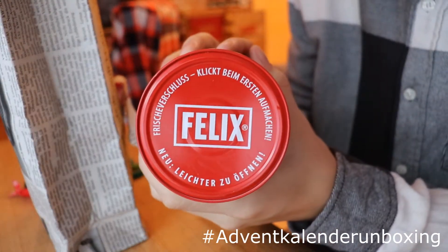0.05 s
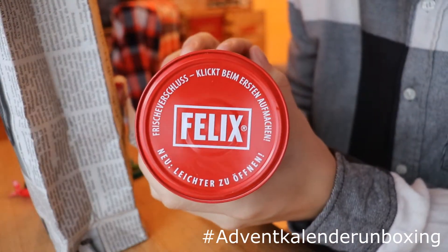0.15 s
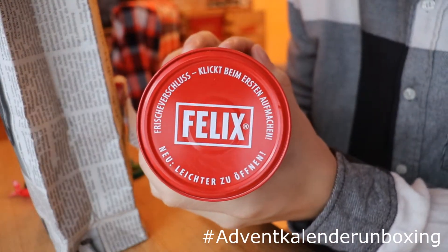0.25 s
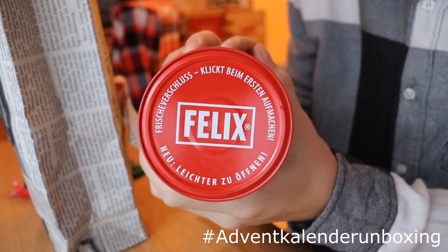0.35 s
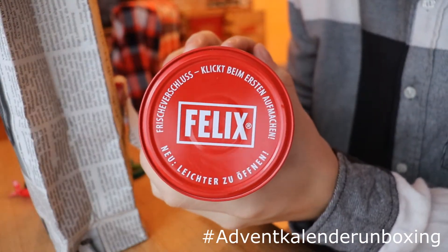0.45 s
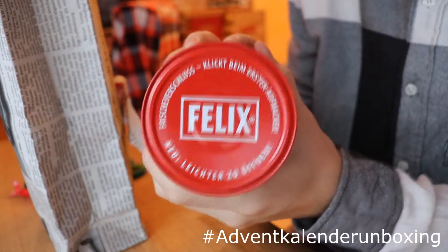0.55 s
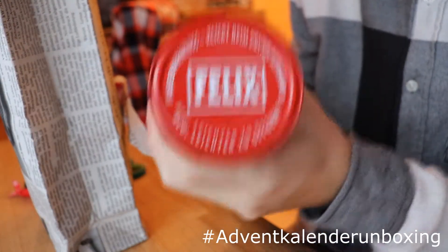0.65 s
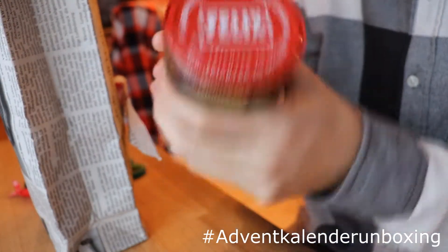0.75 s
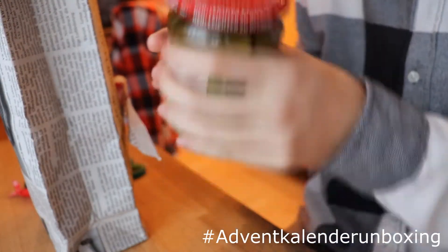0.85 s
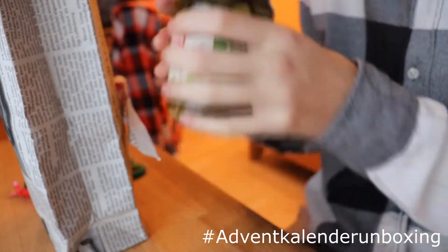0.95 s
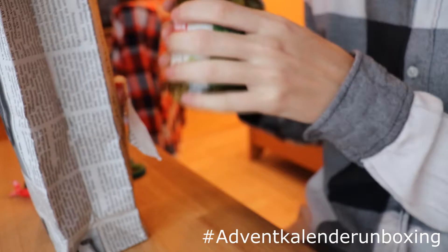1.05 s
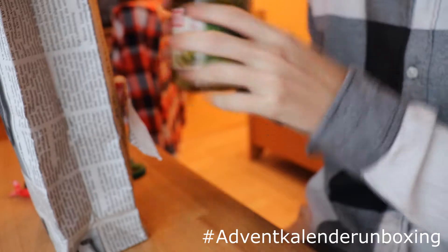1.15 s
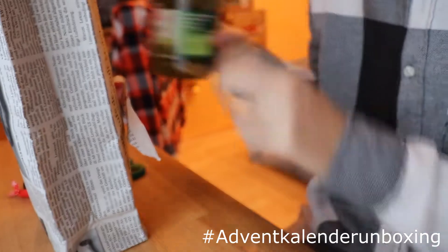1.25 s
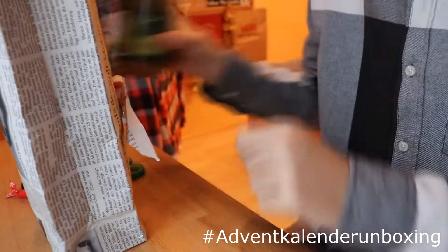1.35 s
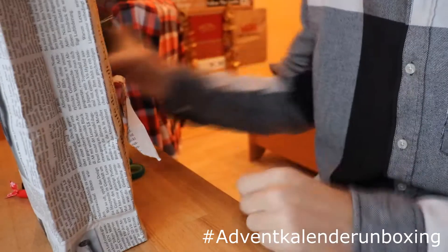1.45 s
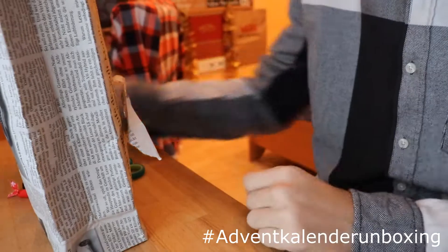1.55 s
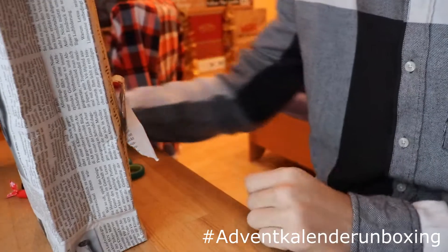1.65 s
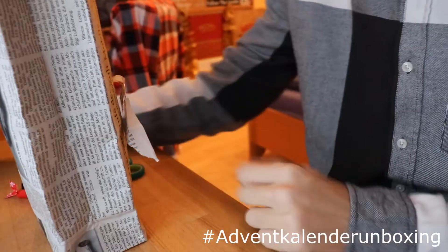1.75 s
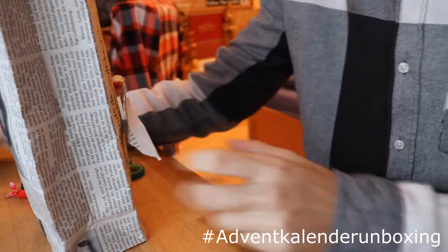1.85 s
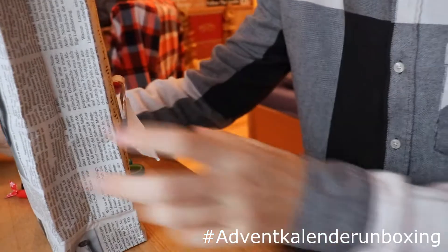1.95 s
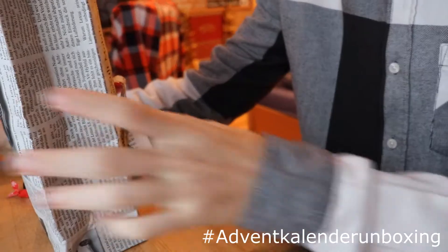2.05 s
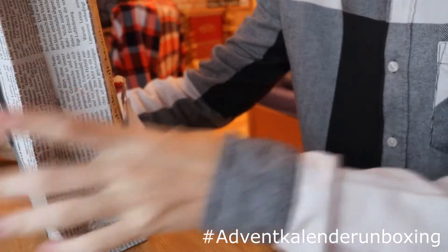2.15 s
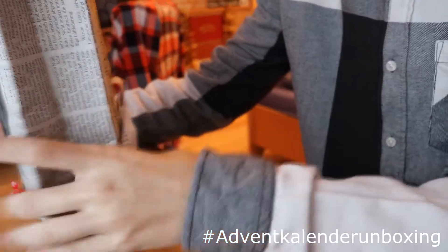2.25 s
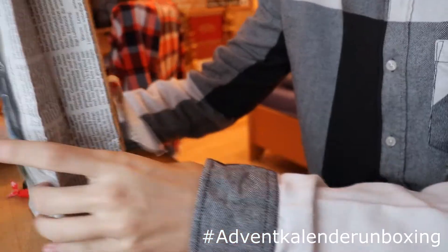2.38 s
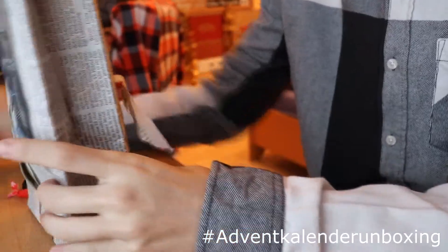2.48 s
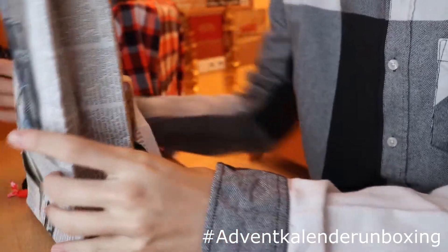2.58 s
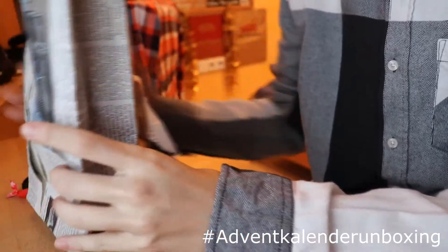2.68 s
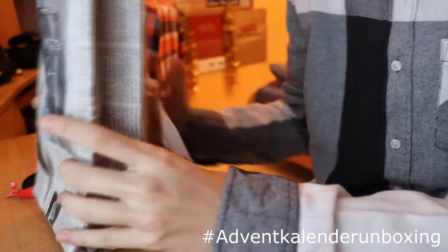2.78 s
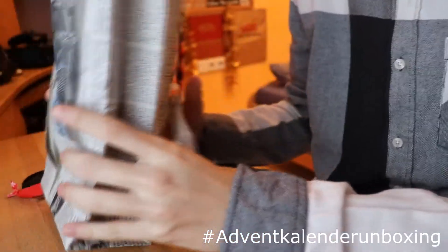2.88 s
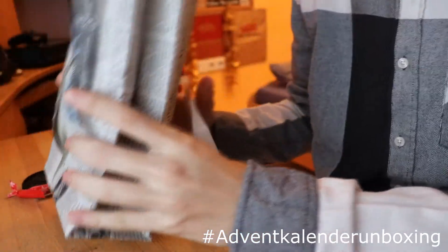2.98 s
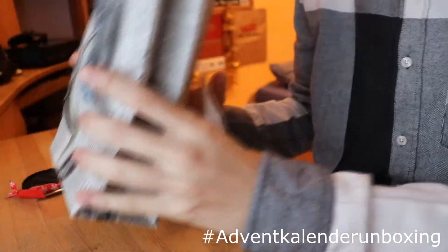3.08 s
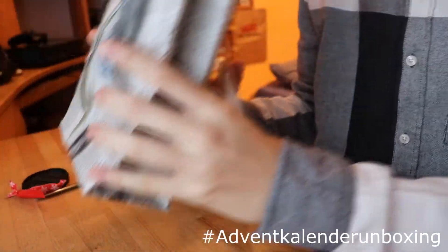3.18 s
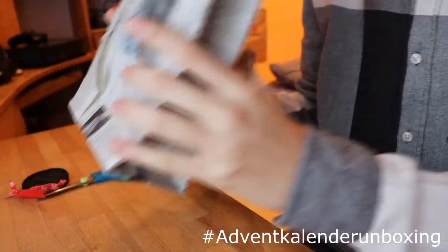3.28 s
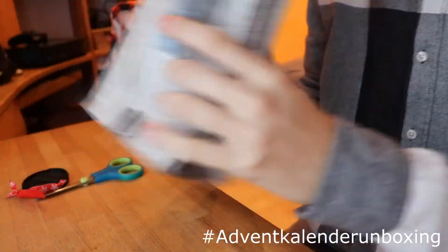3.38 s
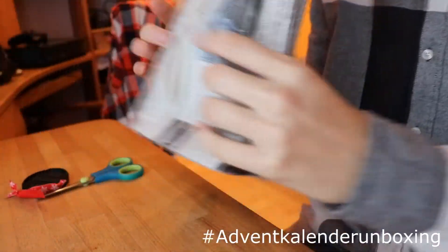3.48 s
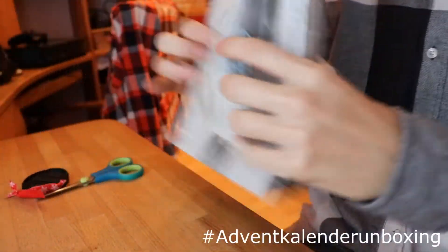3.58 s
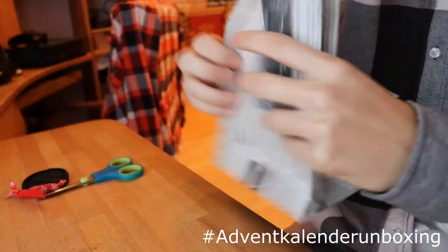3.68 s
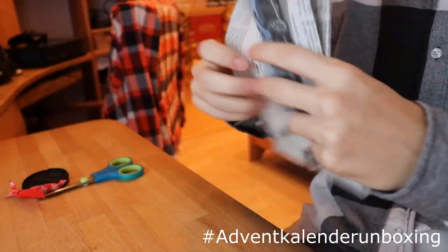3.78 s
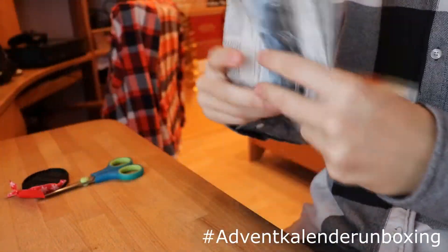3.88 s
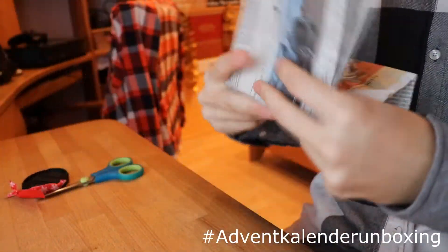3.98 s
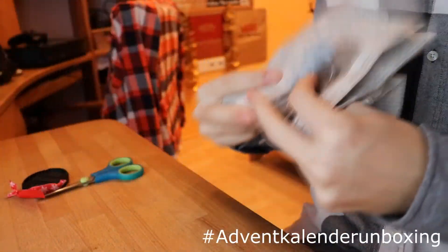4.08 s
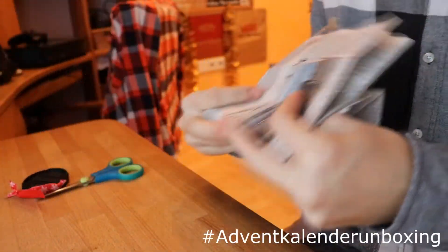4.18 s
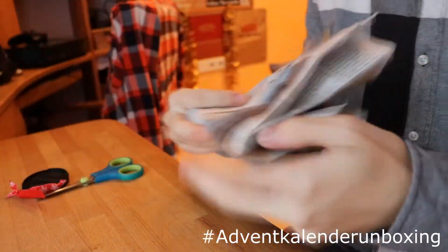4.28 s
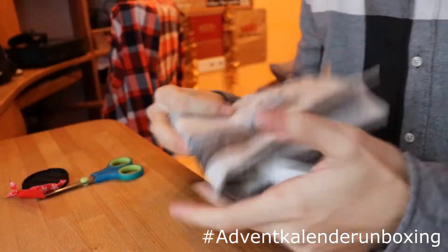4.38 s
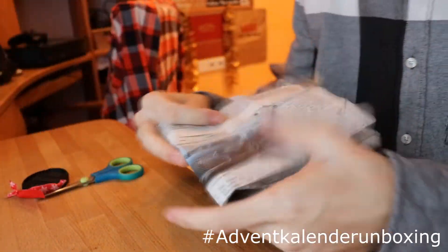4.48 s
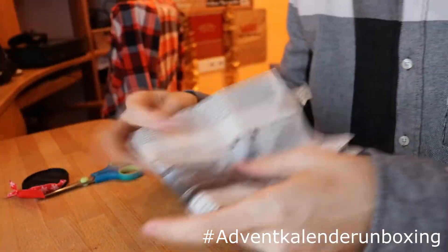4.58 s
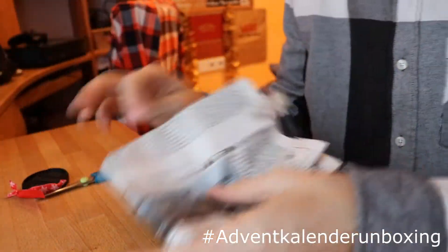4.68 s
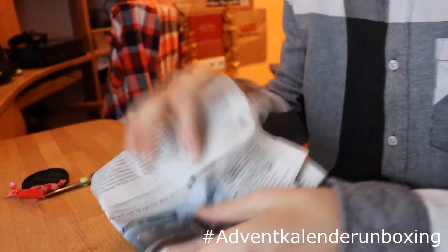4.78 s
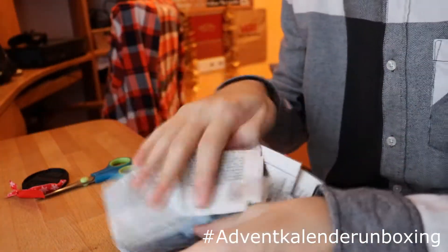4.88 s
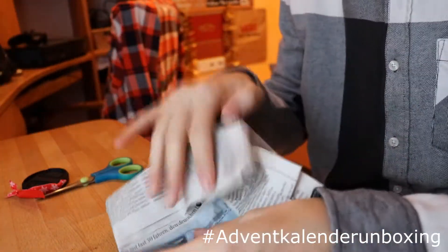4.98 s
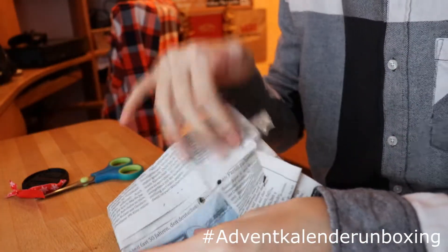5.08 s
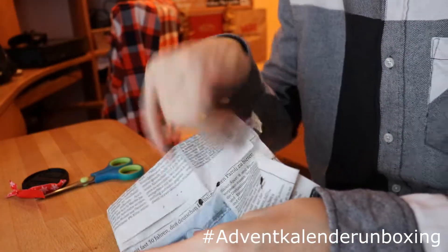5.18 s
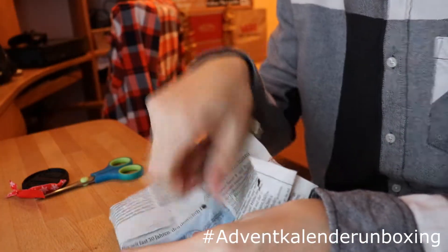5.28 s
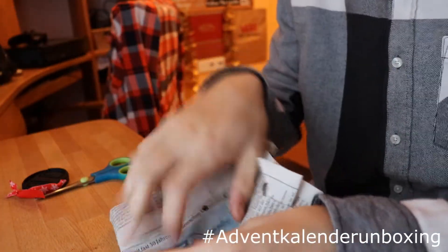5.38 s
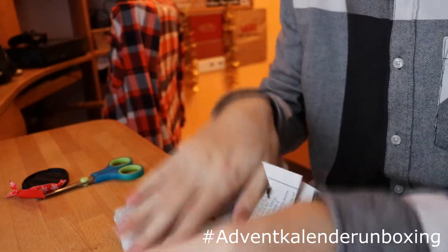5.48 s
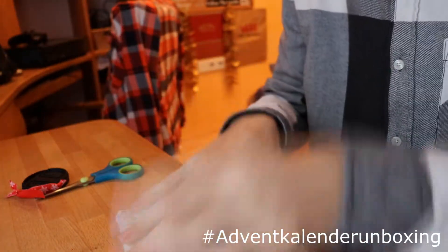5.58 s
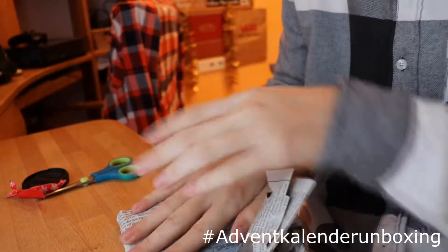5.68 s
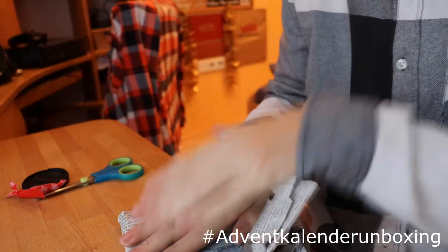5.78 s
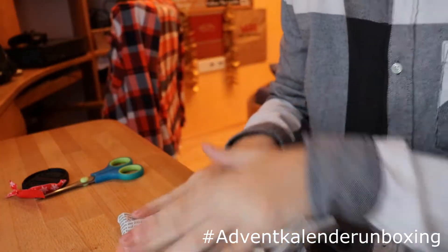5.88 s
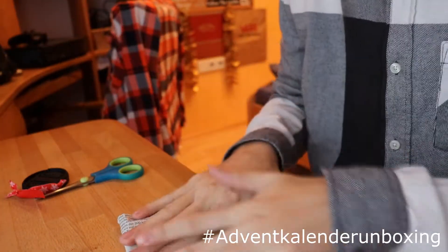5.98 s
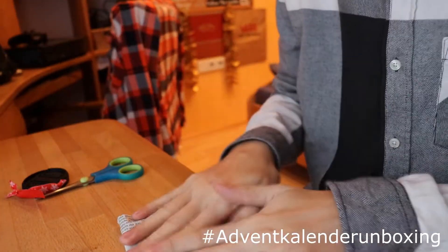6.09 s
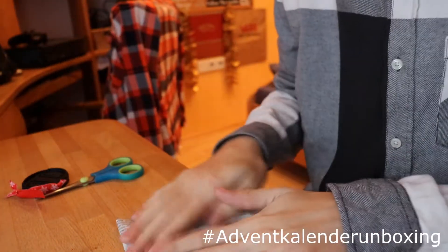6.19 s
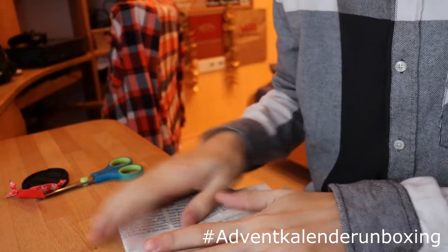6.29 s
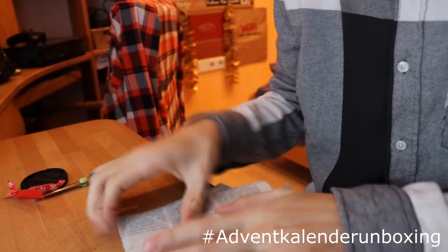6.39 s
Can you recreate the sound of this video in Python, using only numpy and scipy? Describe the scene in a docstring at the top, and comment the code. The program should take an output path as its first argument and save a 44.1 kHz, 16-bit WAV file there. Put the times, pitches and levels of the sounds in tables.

```python
"""A newspaper wrapping is grasped, crumpled and pressed flat close to the microphone in a quiet room.
Its creases are short noise bursts: single snaps over a dense crackle of small ones, with dull pops.
Before that, sleeves rustle as shaped noise and a glass jar is set down, ringing a wooden table.
The table sways under the hands as low noise and sinking tones. A faint room tone lies below."""
import sys
import numpy as np
from scipy import signal
from scipy.fft import rfft, irfft
from scipy.io import wavfile
from scipy.ndimage import uniform_filter1d

SR = 44100
rng = np.random.default_rng(int(sys.argv[2]) if len(sys.argv) > 2 else 0)


def int16_out(signal):
    """Quantize to a 16-bit WAV file."""
    q = np.round(np.clip(np.atleast_2d(signal).T, -1, 1) * 32767)
    wavfile.write(sys.argv[1], SR, q.astype(np.int16))


N = 284004  # length of the scene in samples

# Each squeeze, pull or press of the hands: start t/s, hold t/s, crackle level/dB,
# change over the hold/dB, hollow body of the folds/dB, thin edges/dB, flapping of the sheet/dB
SQUEEZES = [(2.343, .18, -29, -3.5, 3.5, -13, 2), (2.556, .13, -44, -2.5, 0, -7.5, 0),
            (2.843, .25, -28, -5.5, 0, -11, 0.5), (3.154, .025, -39, -2.5, 9.5, -18, 8),
            (3.206, 0.24, -45, -1, -1, -8.5, -10), (3.408, 0.057, -39, 7.5, 2, -5, 4),
            (3.451, 0.077, -22.5, -2.5, 1, -9.5, -3), (3.533, .11, -26, 3, 0.5, -10.5, 0),
            (3.665, 0.1, -22, 1, -2.5, -6.5, -5), (3.767, 0.11, -18.5, -1, -6, -11, -6),
            (3.891, 0.18, -16.5, -9.5, -5, -10.5, -9), (4.057, 0.19, -19, -2, -4, -9.5, -9),
            (4.286, .12, -30.5, 5, -5.5, -4, -7), (4.438, 0.1, -21, -15, -4, -11, -8),
            (4.559, .1, -15.5, -5, -7.5, -5.5, -12.5), (4.673, 0.068, -25.5, 9, -0.5, -12.5, -2),
            (4.768, 0.076, -25, -4, -4.5, -14, -20), (4.859, .21, -13.5, -12, -5, -11.5, -8.5),
            (5.087, 0.14, -18, -4, -5, -8, -8.5), (5.265, .05, -38.5, -3, -2, 2, 8),
            (5.315, 0.12, -24, 1.5, -5.5, -12, -5.5), (5.444, 0.065, -23, 0.5, 1.5, -7, 1.5),
            (5.492, .15, -22.5, 0.5, 5.5, -11, -5), (5.653, .07, -22, -3, 1, -13, -12),
            (5.765, 0.1, -35, -2, 5, -11.5, -10), (5.869, 0.12, -28.5, 10, -2, -4, -14.5),
            (5.998, 0.079, -21, 4, -5, -13, -20), (6.103, 0.1, -23, 1, -10.5, -13.5, -20),
            (6.222, 0.074, -29, 2, -7.5, -4, -13), (6.28, .13, -23.5, -6, -7, -4.5, -16)]
# The sheet creeping between squeezes: crackle level/dB, body/dB, edges/dB, flapping/dB
CREEP = (-50.5, -2.5, -4, 4)
# Tone colour of the paper: f/Hz, level/dB per Hz
PAPER = [(35, -28), (60, -7.5), (184, -4), (270, 0), (620, -5), (1050, -0.5), (1600, -4), (2200, -4),
         (2800, -4.5), (3600, -1.5), (4600, -9), (5800, -5.5), (7400, -12), (11400, -14.5), (15800, -22.5)]
# Creases that buckle: t/s, peak level/dB, ring f/Hz, edges/dB
SNAPS = [(2.408, -11, 3430, -10), (2.4283, -2, 1090, -7.5), (2.621, -27, 4000, -28),
         (2.682, -33, 3500, -13), (2.714, -22.5, 980, -49), (2.874, -7.5, 2920, -3), (2.903, -13, 3930, -2),
         (3.0401, -19, 1140, -24), (3.068, -13, 4200, -17), (3.176, -21.5, 1420, -16),
         (3.403, -21, 5440, -27), (3.431, -10, 5670, -14), (3.4804, -13, 4780, -7),
         (3.6339, -13, 5300, -23), (3.703, 4.5, 5440, -2.5), (3.726, -3.5, 5600, -4), (3.7836, -4, 6400, 8),
         (3.8925, -2, 5770, 15), (3.9235, -2.5, 5070, -9), (3.953, -5.5, 900, -16), (3.968, -8, 9100, 10),
         (3.978, -8, 3700, -2), (3.993, -4, 3620, 4), (4.002, -4.5, 5800, 6), (4.025, -4.5, 5070, -6),
         (4.075, -5.5, 5960, -5), (4.13, -3.5, 3530, -23), (4.1368, -1, 2080, 9), (4.179, -15, 6940, 5),
         (4.199, -13, 5030, 3), (4.2363, -2, 3940, -8), (4.2597, -3, 5630, -2), (4.273, -11, 2870, -5),
         (4.305, -6, 5400, 4), (4.3239, -9, 3380, 1), (4.3433, -13.5, 3180, -10), (4.3736, -11, 5340, -19),
         (4.4239, -7, 5860, 6), (4.568, 1, 3200, -1), (4.6022, -3, 5270, 13), (4.653, -2.5, 1160, 8),
         (4.6962, -5, 8180, -2), (4.7285, -6, 3550, -7), (4.8188, -12, 5000, -9), (4.9057, 0, 2090, -12),
         (4.956, -4.5, 1380, -21), (4.986, -6, 2330, -29), (5.0834, -5, 2850, -11.5),
         (5.164, -0.5, 2500, -2), (5.184, -18, 3500, -25), (5.1924, -4, 3430, 0), (5.2121, -2, 3360, 1),
         (5.2475, -4.5, 8600, 9), (5.3338, 3.5, 2440, -3), (5.354, -7, 6160, -5), (5.367, -2.5, 6740, -4.5),
         (5.462, -2.5, 3570, 7), (5.5, -6, 3140, 13), (5.5585, -2.5, 2040, -7), (5.6023, -0.5, 1870, -31),
         (5.6246, -7.5, 3860, -11), (5.643, -8, 2110, -3), (5.7396, -15.5, 5700, -14),
         (5.779, -18, 1010, -29), (5.809, -21, 6540, -7), (5.8243, -10, 1870, -12), (5.957, 0, 3200, -3),
         (5.9907, -3, 3570, -17), (6.051, -6, 3700, -6), (6.115, -13.5, 8900, 1), (6.1302, -4, 3730, -7),
         (6.153, -6.5, 3200, -15), (6.1752, -5, 1580, -13), (6.3092, -10, 6070, 2),
         (6.332, -14.5, 1560, -3), (6.3612, -11, 1930, -24)]
# Broad faces of the sheet that flip over with a dull pop: t/s, approximate peak level/dB, f/Hz
FLOPS = [(3.425, -35, 253), (3.481, -24, 360), (3.627, -18, 428), (3.727, -20, 272), (3.947, -14.5, 340),
         (4.159, -25, 460), (4.712, -15.5, 310), (4.871, -33, 400), (4.937, -19, 450), (5.323, -61, 327),
         (5.592, -16, 500), (5.943, -22.5, 450)]
# Strokes of a sleeve: start t/s, length t/s, level/dB
STROKES = [(.72, 0.68, -60.5), (1.11, 0.49, -58), (1.5, 0.46, -56), (1.775, 0.066, -48),
           (1.792, 0.44, -48.5), (2.1, 0.45, -53.5)]
# Tone colour of the cloth: f/Hz, level/dB per Hz
CLOTH = [(150, -1), (300, 4.5), (1200, 1.5), (3200, 1.5), (4500, -2), (6000, -2), (7500, -13), (15800, -21)]
# Small ticks of fingers on the jar and paper: t/s, level/dB, f/Hz
TICKS = [(.746, -47, 3200), (.98, -45, 4500), (1.442, -44, 1500), (1.444, -42, 3100), (1.63, -45, 3100),
         (1.65, -46, 3000), (1.783, -41, 4360), (1.797, -41, 5700), (1.806, -42, 3100)]
# The jar lands, rocks and settles: t/s, peak level/dB, fading time of the contact t/s
JAR_CONTACTS = [(1.54, -18.5, 0.016), (1.601, -36, 0.024)]
# Ringing tones of the table under a blow: f/Hz, level/dB, time to fall by 60 dB t/s
TABLE_TONES = [(150, 0, .07), (264, -8, .1), (312, -1, .09), (522, -9, .08), (614, -3, .08),
               (738, -10, .07), (880, -10, .06), (1100, -16, .05), (1443, -18, .05)]
# Loads that set the table swaying: t/s, level/dB, time to fall by 60 dB t/s
LOADS = [(1.56, -37, 4.6), (2.24, -37.5, 1.1), (2.85, -59, 4.3), (3.5, -48, 2), (4.6, -54, 4.),
         (6.15, -37, 2.2)]
# Tone colour of the swaying table: f/Hz, level/dB per Hz
SWAY = [(8, -23), (16, 18), (26, -8), (45, -5), (80, -50)]
# A forearm leans on the table: t/s, level/dB, first f/Hz, last f/Hz, time to fall by 60 dB t/s
BUMPS = [(2.213, -26, 111, 57.3, 0.52), (2.301, -29, 95, 62, .25), (2.329, -20, 76, 65.6, 0.12)]
# How long the room rings in each band: f/Hz, time to fall by 60 dB t/s
ROOM_T60 = [(300, 1), (2000, 0.45), (12000, 0.032)]
# Tone colour of the quiet room: f/Hz, level/dB per Hz
ROOM_TONE = [(12, -37), (20, -8), (42, -6), (355, -9), (408, -13), (456, -10), (524, -11.5), (3220, -20),
             (9300, -21.5), (15800, -23)]

BODY_HZ, EDGES_HZ, FLAP_HZ = 970, 11700, 207  # centres of the three changing paper colours
CRACKLES_PER_S = 2200
CRACKLE_SPREAD_DB, CLUMP_DB, SHEET_HISS_DB = 4.8, 3.2, -7
GRIP_S, LET_GO_DB_PER_S, CREEP_START_S = 0.016, 373, 2.28
SNAP_S, SLOWER_PER_DB = 0.00067, 0.09  # time scale of a 0 dB snap; weaker snaps rattle longer
LOAD_RISE_S = 0.074
ROOM_DB, ROOM_TONE_DB = -16, -56.5
TOP_HZ = 16000  # upper edge of the band kept by the final low-pass


def gain_of(db):
    """Turn decibels into a plain multiplier."""
    return 10 ** (np.asarray(db) / 20)


def evened(x):
    """Scale a signal to an average (RMS) strength of 1."""
    return x / np.sqrt(np.mean(x ** 2) + 1e-20)


def read(points, hz):
    """Read a curve between its points, along a log-frequency axis."""
    f, value = np.transpose(points)
    return np.interp(np.log(hz + 1), np.log(f + 1), value)


def add(mix, s, sound):
    """Lay a sound into the mix at s seconds, cut off at the end of the mix."""
    part = mix[round(s * SR):][:len(sound)]
    part += sound[:len(part)]


def bump(hz, centre_hz, octaves):
    """Draw a bell of height about 1 on a log-frequency axis."""
    return np.exp(-.5 * (np.log2((hz + 20) / centre_hz) / octaves) ** 2)


def coloured(x, points):
    """Give a signal the tone colour of a curve, at an average strength of 1."""
    hz = np.fft.rfftfreq(len(x), 1 / SR)
    spectrum = rfft(x) * gain_of(read(points, hz))
    return evened(irfft(spectrum, len(x)))


def causal(db):
    """Make an impulse response that starts at once and has the given gain (minimum phase)."""
    both_sides_db = np.r_[db, db[-2:0:-1]]
    log_gain = np.log(gain_of(both_sides_db))
    phase = -signal.hilbert(log_gain).imag
    return np.fft.ifft(np.exp(log_gain + 1j * phase)).real


def crackle():
    """Many small creases give way in clumps; the shape of the bundle colours them."""
    clumps = evened(uniform_filter1d(uniform_filter1d(rng.standard_normal(N), 160), 160))
    spread = np.minimum(rng.exponential(1, N), 3.2)
    size = gain_of(CRACKLE_SPREAD_DB * spread + CLUMP_DB * clumps)
    size *= rng.random(N) < CRACKLES_PER_S / SR  # only a few samples start a crackle

    # 24 kinds of grain, from short to long; each facet favours its own band
    kind, grains = rng.integers(0, 24, N), np.zeros(N)
    t, hz = np.arange(400) / SR, np.fft.rfftfreq(512, 1 / SR)
    for k, length in enumerate(np.geomspace(.00007, .0008, 24)):
        facet_hz = 700 * gain_of(27 * rng.random())
        facet = causal(12.0 * bump(hz, facet_hz, .35))[:200]
        burst = rng.standard_normal(400) * np.exp(-.5 * (t / length - 3) ** 2)
        grain = signal.fftconvolve(burst, facet)
        grain /= np.linalg.norm(grain)
        grains += signal.oaconvolve(size * (kind == k), grain)[:N]
    hiss = gain_of(SHEET_HISS_DB) * rng.standard_normal(N)  # plies sliding on plies
    sheet = evened(grains) + hiss

    # The hands change the colour from moment to moment
    hz, t, frames = signal.stft(sheet, SR, nperseg=512, noverlap=384)
    level, body_db, edges_db, flap_db = hands(t)
    shape_db = 0
    for centre_hz, octaves, db in [(BODY_HZ, .7, body_db), (EDGES_HZ, .6, edges_db), (FLAP_HZ, .8, flap_db)]:
        shape_db = shape_db + np.outer(bump(hz, centre_hz, octaves), db - db.mean())
    frames = frames * gain_of(read(PAPER, hz)[:, None] + shape_db)
    paper = signal.istft(frames, SR, nperseg=512, noverlap=384)[1][:N]
    return evened(paper) * np.interp(np.arange(N) / SR, t, level)


def hands(t):
    """Squeezing sets the crackle level; the stronger squeezes weigh more in the mixed colours."""
    start, hold, db, change_db, *colours = np.transpose(SQUEEZES)[:, :, None]
    since = t - start
    held_db = db + change_db * np.clip(since / hold, 0, 1)
    level = gain_of(held_db - LET_GO_DB_PER_S * np.maximum(since - hold, 0))
    power = (level * np.clip(since / GRIP_S, 0, 1)) ** 2
    creep_power = gain_of(CREEP[0]) ** 2
    total = power.sum(0) + creep_power
    mixed = [((power * colour).sum(0) + creep_power * rest) / total
             for colour, rest in zip(colours, CREEP[1:])]
    touched = np.clip((t - CREEP_START_S) / GRIP_S, 0, 1)  # silent until the sheet is touched
    return np.sqrt(total) * touched, *mixed


def snaps():
    """Each buckling crease is a rattle that swells and dies at once, ringing the facet beside it."""
    out, t, hz = np.zeros(N), np.arange(2048) / SR, np.fft.rfftfreq(1024, 1 / SR)
    rattles = rng.standard_normal((len(SNAPS), 2048))
    usual_edges_db = np.mean(SNAPS, axis=0)[3]
    for (s, db, ring_hz, edges_db), rattle in zip(SNAPS, rattles):
        colour_db = read(PAPER, hz) + 9.0 * bump(hz, ring_hz, .35)
        colour_db += (edges_db - usual_edges_db) * bump(hz, EDGES_HZ, 0.69)
        colour_db -= 9.6 * bump(hz, FLAP_HZ, 0.9)  # a small crease moves little air
        u = t / max(SNAP_S * np.exp(-SLOWER_PER_DB * db), .0002)
        swell = u * np.exp(-1.6 * u ** 1.3)
        after_rattle = .1 * np.exp(-t / .003)
        drive = rattle * (swell + after_rattle)
        snap = signal.fftconvolve(drive, causal(colour_db)[:700])[:2048]
        add(out, s, gain_of(db) * snap / abs(snap).max())
    return out


def flops():
    """A broad face of the sheet flips over: a low tone that rises and dies within moments."""
    out, t = np.zeros(N), np.arange(4000) / SR
    for s, db, hz in FLOPS:
        fade = gain_of(db - 60 * t / 0.021)
        rise = 1 - np.exp(-t / 0.00067)
        add(out, s, fade * np.sin(2 * np.pi * hz * t) * rise * 1.74)  # 1.74 makes up for the slow rise
    return out


def rustle():
    """Cloth slides on cloth in fine uneven grains; each stroke swells and fades."""
    t = np.arange(N) / SR
    flicker = evened(uniform_filter1d(rng.standard_normal(N), 120))
    grains = rng.standard_normal(N) * gain_of(1.6 * flicker)
    power = 0
    for s, length, db in STROKES:
        progress = np.clip((t - s) / length, 0, 1)
        power = power + (gain_of(db) * np.sin(np.pi * progress ** 0.63)) ** 2
    return coloured(grains, CLOTH) * np.sqrt(power)


def finger_ticks():
    """Fingers tick on the jar and paper: narrow bands of noise that die quickly."""
    out, t = np.zeros(N), np.arange(1500) / SR
    for (s, db, hz), noise in zip(TICKS, rng.standard_normal((len(TICKS), 1500))):
        b, a = signal.butter(2, [hz / 1.2, hz * 1.2], "band", fs=SR)
        tick = evened(signal.lfilter(b, a, noise))
        add(out, s, gain_of(db - 60 * t / .04) * tick * .6)
    return out


def jar():
    """The rim grinds down in a brief uneven contact that rings the table top."""
    t, out = np.arange(SR // 2) / SR, np.zeros(N)
    ring = sum(gain_of(db - 60 * t / t60) * np.sin(2 * np.pi * hz * t) for hz, db, t60 in TABLE_TONES)
    grinds = rng.standard_normal((len(JAR_CONTACTS), len(t)))
    for (s, db, contact), grind in zip(JAR_CONTACTS, grinds):
        push = uniform_filter1d(grind, 22) * np.exp(-t / contact) * (1 - np.exp(-t / 0.0026))
        knock = signal.fftconvolve(push, ring)[:len(t)]
        add(out, s, gain_of(db) * knock / abs(knock).max())
    return out


def table_sway():
    """The table sways unevenly on its legs: low noise that rises with each load and dies away."""
    t = np.arange(N) / SR
    sway = coloured(rng.standard_normal(N), SWAY)
    # Level out the noise, so that mostly the loads set its strength
    sway /= np.sqrt(uniform_filter1d(sway ** 2, 8000) + 0.044)
    strength = 0
    for s, db, t60 in LOADS:
        rise = np.clip((t - s) / LOAD_RISE_S, 0, 1)
        strength = strength + gain_of(db - 60 * (t - s) / t60) * rise
    return sway * strength


def arm_bumps():
    """The table answers a leaning forearm with a low tone that sinks in pitch."""
    out, t = np.zeros(N), np.arange(SR // 3) / SR
    for s, db, first_hz, last_hz, t60 in BUMPS:
        hz = last_hz + (first_hz - last_hz) * np.exp(-t / 0.034)
        tone = np.sin(2 * np.pi * np.cumsum(hz) / SR)
        add(out, s, gain_of(db - 60 * t / t60) * tone * (1 - np.exp(-t / .006)))
    return out


def room(x):
    """Echoes are sparse taps of random sign, each band dying at its own speed."""
    taps = np.zeros(SR // 2)
    at = np.arange(120, SR // 2 - 20, 20)
    taps[at + rng.integers(0, 20, len(at))] = rng.choice([-1., 1.], len(at))
    hz, t, frames = signal.stft(taps, SR, nperseg=256)
    fade = gain_of(-60 * t / read(ROOM_T60, hz)[:, None])
    tail = signal.istft(frames * fade, SR, nperseg=256)[1]
    return signal.fftconvolve(x, tail / np.linalg.norm(tail))[:N]


def room_tone():
    """The quiet room itself is steady, faint coloured noise."""
    return gain_of(ROOM_TONE_DB) * coloured(rng.standard_normal(N), ROOM_TONE)


def scene():
    """Paper, cloth and fingers get echoes; the table sounds and room tone are added without any."""
    near = crackle() + snaps() + flops() + rustle() + finger_ticks()
    table = jar() + table_sway() + arm_bumps()
    mix = near + gain_of(ROOM_DB) * room(near) + table + room_tone()
    return mix[None]


def record(dry):
    """The converter clips at full scale; then a low-pass filter limits the band."""
    low_pass = signal.firwin(511, TOP_HZ, window=("kaiser", 9), fs=SR)
    return signal.oaconvolve(np.clip(dry, -1, 1), low_pass[None], "same")


dry = scene()
out = record(dry)
int16_out(out)
```